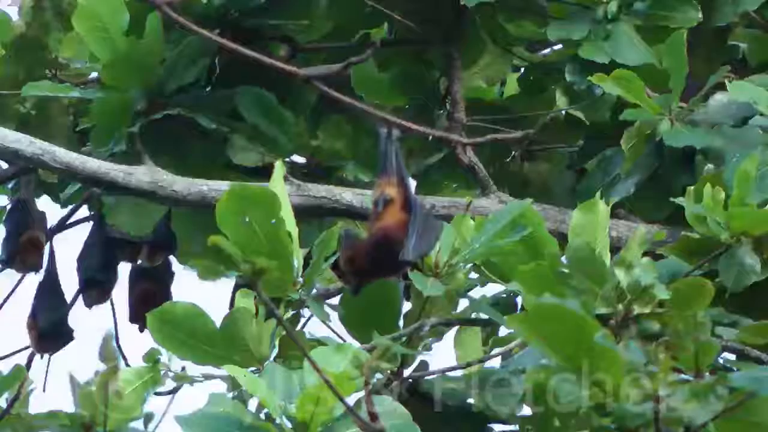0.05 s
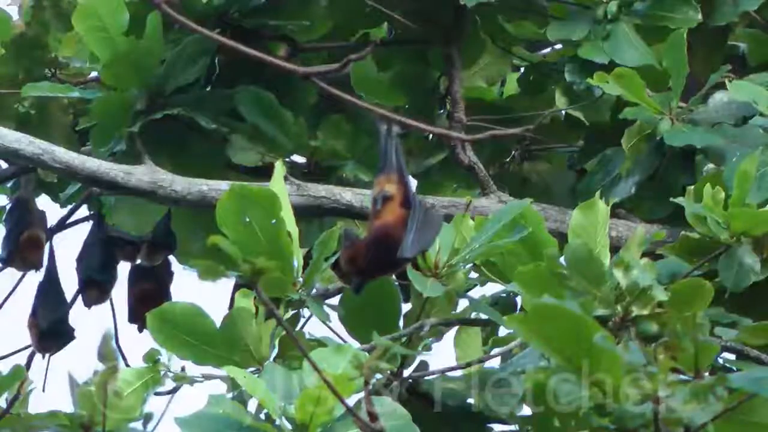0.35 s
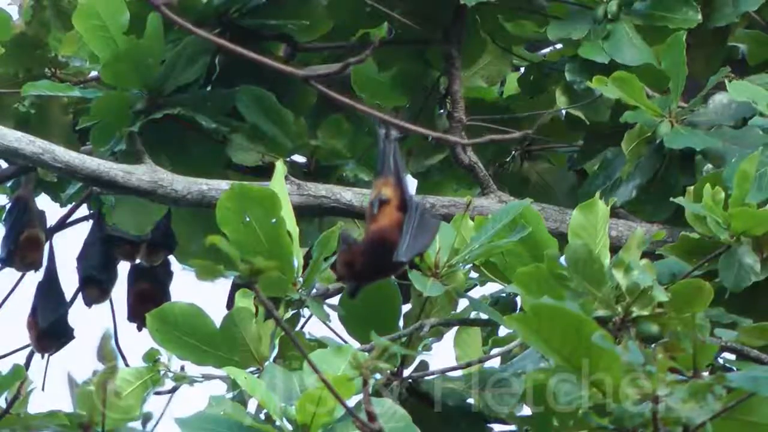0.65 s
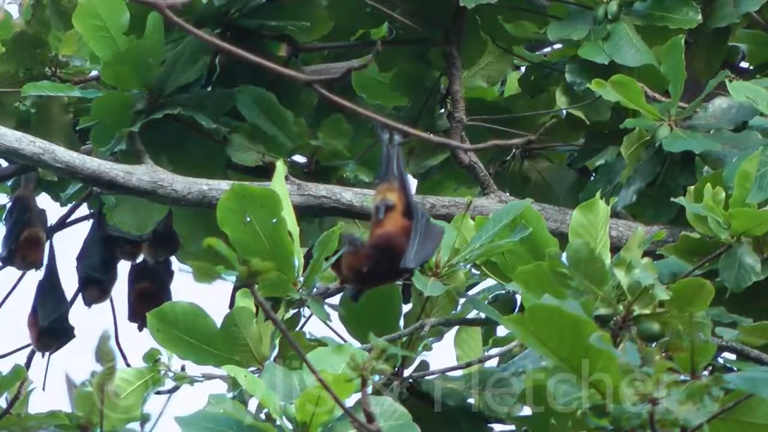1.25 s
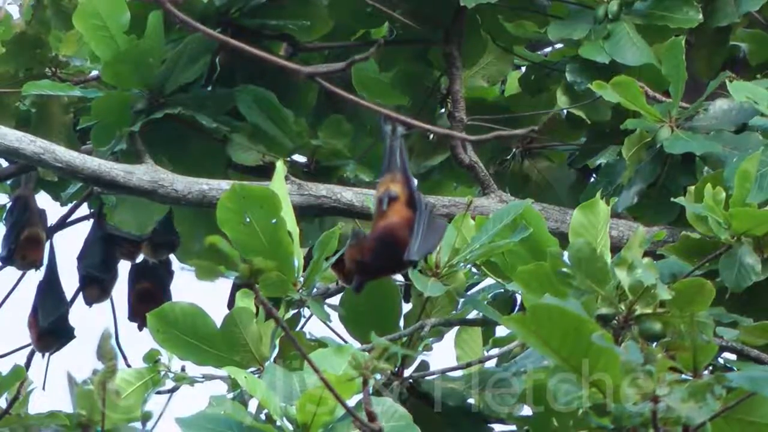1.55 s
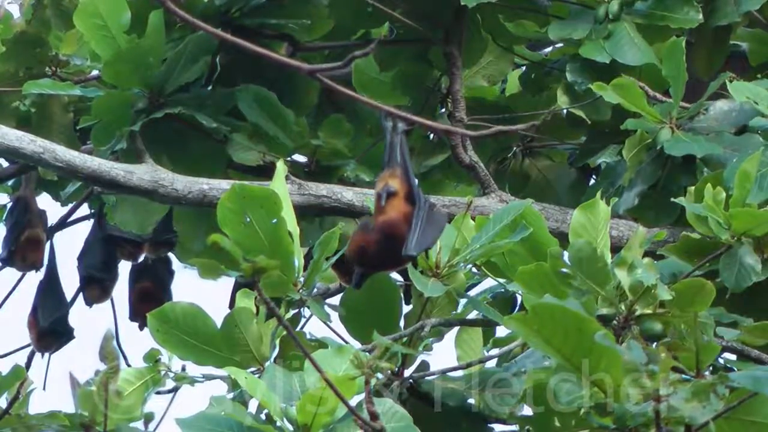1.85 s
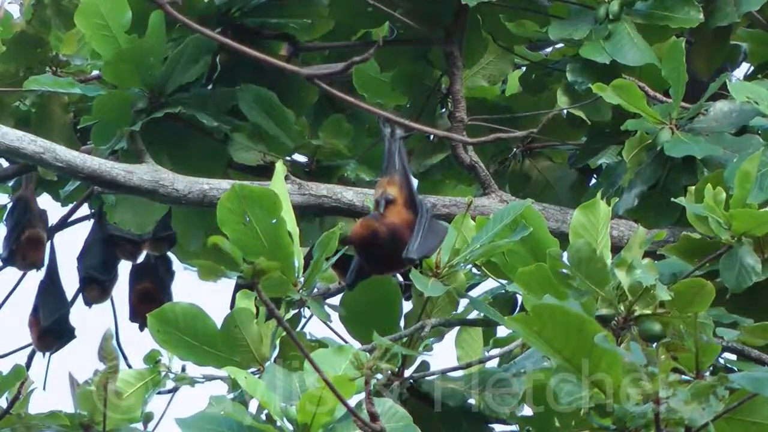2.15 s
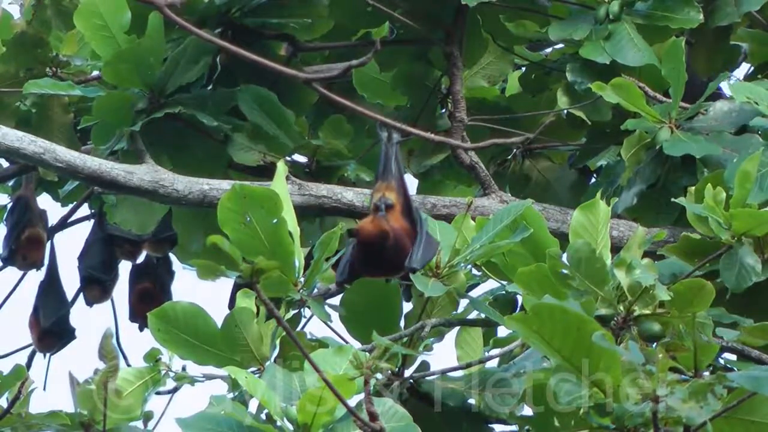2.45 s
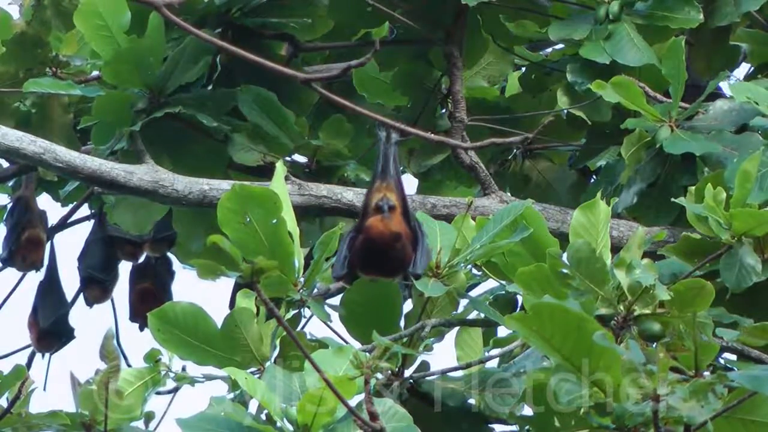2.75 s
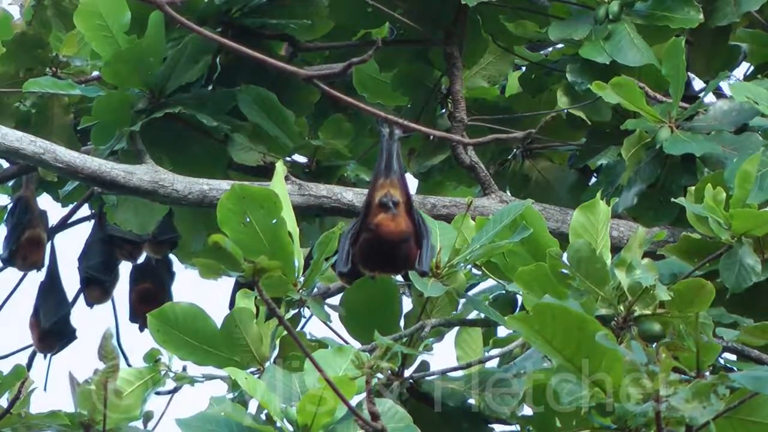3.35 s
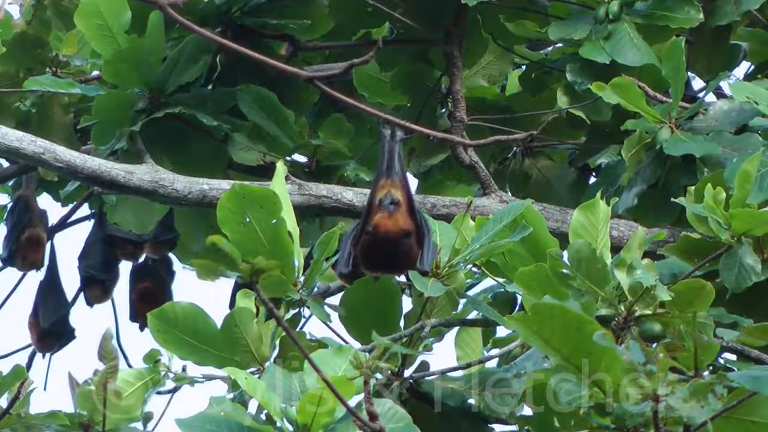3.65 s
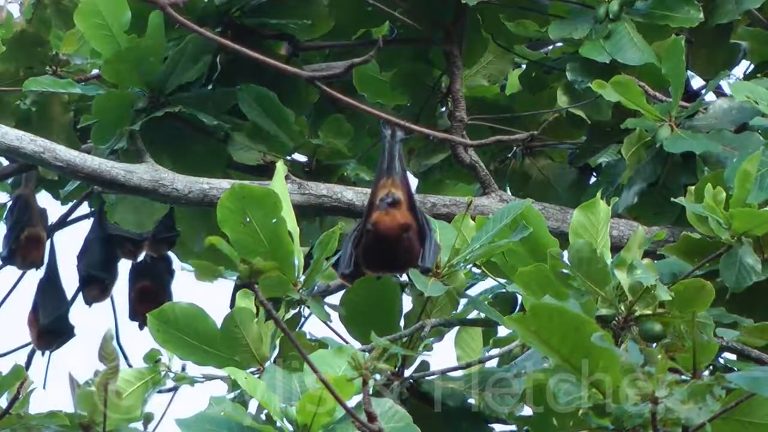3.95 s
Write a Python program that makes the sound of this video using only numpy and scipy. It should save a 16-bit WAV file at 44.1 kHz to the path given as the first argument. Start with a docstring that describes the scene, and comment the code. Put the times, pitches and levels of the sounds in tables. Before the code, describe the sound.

Waves break softly on a shore, with thin bird whistles and chirps in the trees.

```python
"""Surf on a shore, heard from under trees: two waves break with a low roar and a hissing wash of foam,
over a deep rumble and a few soft thumps as the breakers slump. Wind briefly buffets the microphone.
Unseen birds give thin, drawn-out whistles and a few harsh chirps,
which trunks and leaves scatter into echoes."""
import sys
import numpy as np
from scipy import signal
from scipy.fft import rfft, irfft, next_fast_len
from scipy.io import wavfile
from scipy.ndimage import uniform_filter1d, map_coordinates

SR = 44100
rng = np.random.default_rng(int(sys.argv[2]) if len(sys.argv) > 2 else 0)


def bounce(signal):
    """Save signal as a 16-bit WAV file at the path given by the first command-line argument."""
    frames = np.transpose(np.atleast_2d(signal))
    limited = np.clip(frames, -1, 1)
    pcm = np.round(limited * 32767).astype(np.int16)
    wavfile.write(sys.argv[1], SR, pcm)


N = 176400

# Fader rides for the sea's rumble, the breakers' roar, the foam and the wind: t/s, relative level/dB
RUMBLE_RIDE = [(.06, -54), (.5, -53), (.95, -52.5), (1.35, -53.5), (1.7, -58), (2.1, -56), (2.45, -56),
               (2.8, -57), (3.3, -55.5), (3.9, -55.7)]
ROAR_RIDE = [(0.06, -51.5), (0.07, -53), (0.39, -50.5), (0.89, -52), (1.06, -49), (1.12, -52),
             (1.14, -47.5), (1.71, -56.5), (2.1, -51.5), (2.52, -55.5), (3.13, -56), (3.21, -53.5),
             (3.83, -52), (3.97, -53.5)]
FOAM_RIDE = [(0.06, -47.5), (0.35, -47), (0.39, -48.5), (0.73, -49.5), (0.97, -48), (1.14, -50.5),
             (1.16, -49), (1.3, -51.5), (1.56, -51.5), (1.74, -54.5), (2.06, -50.5), (2.71, -55.5),
             (3.49, -47), (3.56, -48), (3.97, -49.5)]
BUFFET_RIDE = [(.04, -49), (.09, -47), (.2, -60), (.4, -54), (.56, -55), (.7, -72), (1.6, -66), (3.4, -66),
               (4, -72)]
# EQ curves for the same four layers and the background hiss: f/Hz, relative level/dB
RUMBLE_EQ = [(20, -26), (40, -10), (65, -1.5), (120, 0.5), (155, -2), (190, 1.5), (240, -4), (330, -15),
             (600, -36)]
ROAR_EQ = [(150, -35), (250, -3), (370, -0.5), (480, -4.5), (545, 0), (635, -3.5), (750, 2), (860, -3),
           (990, -4), (1080, -1), (1150, -5.5), (1225, -1.5), (1310, -6.5), (1420, -.5), (1570, -8),
           (1680, -8.5), (2150, -35), (3600, -100)]
FOAM_EQ = [(900, -20), (1500, -9), (1750, 1), (2100, 0), (2700, -1.5), (4000, -3.5), (5000, -5.5),
           (6300, -9), (8000, -15), (11000, -23.5), (15500, -31.5)]
BUFFET_EQ = [(15, -12), (30, -5), (60, -0.5), (100, -11), (250, -26), (600, -70)]
HISS_EQ = [(1000, -9.5), (3000, -0.5), (6000, 5), (8600, -10), (9800, 3.5), (11000, -8), (15500, -12)]
# Stereo image of sea and hiss: f/Hz, left-right correlation (1 and above is mono)
SHORE_IMAGE = [(30, .1), (60, .3), (125, 0.86), (250, .8), (500, 0.6), (1000, 0.7), (2000, 0.85),
               (4000, .9), (8000, .88), (11000, 1.2)]
# Pan of the sea across the spectrum: f/Hz, left minus right/dB
SEA_PAN = [(60, -2.0), (120, -2.2), (240, -1.0), (480, 0.79), (950, 2.2), (1890, 1.5), (3770, 0.23),
           (7520, 0.11), (15000, 0.0)]
# The first wave breaks a little to the left of the second: t/s, left minus right/dB
SEA_DRIFT = [(0, .1), (1.2, .5), (1.9, -.2), (3.3, -.7)]
# Thumps of slumping breakers: t/s, width/s, level/dB, centre f/Hz
BREAKER_THUMPS = [(.84, .03, -52, 120), (1.02, .04, -48, 280), (2.5, .035, -57, 130)]
# Bird whistles: t/s, length/s, first f/Hz, last f/Hz, level/dB, waver/share of pitch
BIRD_WHISTLES = [(.13, .2, 3740, 3600, -50, .007), (.53, .085, 5000, 4980, -53.5, .007),
                 (.63, .135, 4950, 4710, -48.5, .014), (.76, .225, 4640, 4412, -44, .0012),
                 (1.33, .17, 3280, 3170, -53.5, .005), (1.57, .12, 2880, 2830, -54.5, .004),
                 (1.88, 0.12, 4900, 4650, -56, .018), (2.06, .24, 4370, 4300, -44.8, .0015),
                 (2.92, .075, 4680, 4780, -48, .008), (3.018, .11, 5400, 5500, -54.5, .01),
                 (3.52, .19, 3300, 3425, -49.5, .003), (3.82, .125, 5250, 4930, -50.5, .011),
                 (3.922, .09, 4950, 4700, -47, .009)]
# Slapback of the whistles off the trees: delay/s, level/dB
TREE_ECHOES = [(.085, -13), (.175, -11)]
# Bird chirps: t/s, length/s, first f/Hz, last f/Hz, level/dB, jitter/share of pitch
BIRD_CHIRPS = [(1.422, .045, 4800, 5650, -49.5, .08), (1.616, .03, 4600, 5350, -47.5, .06),
               (1.635, .035, 4356, 4220, -49.5, .02), (1.674, .065, 4650, 4400, -51.5, .04),
               (1.978, .04, 4450, 6100, -42.5, .036), (2.274, .024, 4900, 5900, -44.5, .065)]

FOAM_TRIM_DB, BUFFET_TRIM_DB, HISS_DB = 2.5, -2, -62
WHISTLE_SWELL_POWER, WHISTLE_RELEASE_S, FLUTTER_DB, GLIDE_POWER = .75, .015, 2.8, 2.8
TREES_T60_S, WHISTLE_SEND_DB = .5, -10
RASP_HZ, SPLIT_ABOVE_HZ, SPLIT_OFFSET_HZ, SPLIT_DB = 1300, 5800, 780, -8.5
HIGH_CUT_HZ = 15750


def amp(db):
    """Decibels to gain."""
    return 10 ** (np.asarray(db) / 20)


def along(points, hz):
    """Read (f/Hz, value) points on a log frequency axis."""
    f, v = np.transpose(points)
    return np.interp(np.log(hz + 1), np.log(f + 1), v)


def ride(points):
    """Automation: (t/s, value) points as one value per sample."""
    return np.interp(np.arange(N) / SR, *np.transpose(points))


def wobble(rate_hz, size=N):
    """A smooth random modulator."""
    return map_coordinates(rng.standard_normal(4096), [np.arange(size) * rate_hz / SR], mode="wrap")


def filtered(x, response):
    """Equalise x with a gain that is a function of frequency."""
    m = next_fast_len(N + SR // 4)
    return irfft(rfft(x, m) * response(np.fft.rfftfreq(m, 1 / SR)), m)[..., :N]


def add(track, s, sound):
    """Mix a mono or stereo sound into a stereo track at time s."""
    part = track[:, max(round(s * SR), 0):][:, :sound.shape[-1]]
    part += sound[..., :part.shape[1]]


def noise_bed(eq, image=SHORE_IMAGE, patchy_db=0):
    """Shaped stereo noise, mottled in time and frequency, with its mid channel at rms 1."""
    spectra = signal.stft(rng.standard_normal((2, N)), nperseg=512)[2]
    patches = uniform_filter1d(rng.standard_normal(spectra.shape[1:]), size=5, axis=0)
    patches = uniform_filter1d(patches, size=14, axis=1)
    patches /= np.sqrt(np.mean(patches ** 2))
    pair = signal.istft(spectra * amp(patchy_db * patches), nperseg=512)[1][:, :N]

    def mid_side_gains(hz):
        spread = np.arccos(np.clip(along(image, hz), -1, 1)) / 2
        return amp(along(eq, hz)) * [np.cos(spread), np.sin(spread)]

    mid, side = filtered(pair, mid_side_gains)
    return np.array([mid + side, mid - side]) / mid.std()


def surf():
    """Rumble, roar and foam swell with each wave; breakers slump with soft thumps."""
    rumble = amp(ride(RUMBLE_RIDE)) * noise_bed(RUMBLE_EQ)
    roar = amp(ride(ROAR_RIDE) + .37 * wobble(14)) * noise_bed(ROAR_EQ, patchy_db=.84)
    foam = amp(FOAM_TRIM_DB + ride(FOAM_RIDE) + .24 * wobble(29.98)) * noise_bed(FOAM_EQ, patchy_db=.78)
    sea = rumble + roar + foam
    t = np.arange(N) / SR
    for s, width, db, hz in BREAKER_THUMPS:
        thump_eq = [(hz / 8, -50), (hz / 1.6, 0), (hz * 1.54, 0), (hz * 6, -70)]
        swell = np.exp(-.5 * ((t - s) / width) ** 2)
        sea += amp(db) * swell * noise_bed(thump_eq)
    pan = np.array([[.5], [-.5]])
    sea *= amp(ride(SEA_DRIFT) * pan)
    return filtered(sea, lambda hz: amp(along(SEA_PAN, hz) * pan))


def wind():
    """Wind buffets each microphone port separately, over a faint steady hiss."""
    buffet = noise_bed(BUFFET_EQ, image=[(30, .05)], patchy_db=.5)
    hiss = noise_bed(HISS_EQ, patchy_db=-.5)
    return amp(BUFFET_TRIM_DB + ride(BUFFET_RIDE)) * buffet + amp(HISS_DB) * hiss


def glide(first_hz, last_hz, u):
    """Pitch moves quickly at first and settles as the note (u from 0 to 1) ends."""
    return last_hz + (first_hz - last_hz) * (1 - u) ** GLIDE_POWER


def tone(hz):
    """A sine that follows a pitch curve."""
    return np.sin(2 * np.pi * np.cumsum(hz) / SR)


def whistles():
    """Thin bird notes swell, glide and stop; each path through the leaves flutters in its own way."""
    out = np.zeros((2, N))
    for s, length, first_hz, last_hz, db, waver in BIRD_WHISTLES:
        n = int(length * SR)
        u = np.arange(n) / n
        swell = u ** WHISTLE_SWELL_POWER * np.minimum((1 - u) * length / WHISTLE_RELEASE_S, 1)
        for delay, path_db in [(.00072, 0)] + TREE_ECHOES:  # direct path, then slapback
            hz = glide(first_hz, last_hz, u) * (1 + waver * wobble(218, size=n))
            note = amp(db + path_db + FLUTTER_DB * wobble(58.7, size=n)) * swell * tone(hz)
            add(out, s + delay, note)
            add(out, s + delay, amp(WHISTLE_SEND_DB) * tree_reverb(note))
    return out


def tree_reverb(call):
    """Trunks and leaves scatter a call into a diffuse stereo tail."""
    t = np.arange(SR // 2) / SR
    mid, side = rng.standard_normal((2, len(t))) * amp(-60 * t / TREES_T60_S)
    impulse = np.array([mid + .35 * side, mid - .2 * side]) / np.linalg.norm(mid)
    return signal.fftconvolve(call[None], impulse, axes=1)


def chirp(length, first_hz, last_hz, db, jitter):
    """A fast sweep made harsh by pitch jitter; the highest ones split off a second tone above."""
    n = int(length * SR)
    u = np.arange(n) / n
    hz = glide(first_hz, last_hz, u) * (1 + jitter * wobble(RASP_HZ, size=n))
    split_gain = amp(SPLIT_DB) * (last_hz > SPLIT_ABOVE_HZ) * np.minimum(2 * u, 1)
    upper = tone((last_hz + SPLIT_OFFSET_HZ) * (1 + .025 * wobble(RASP_HZ, size=n)))
    envelope = np.sqrt(2 * np.sin(np.pi * u))
    return amp(db) * envelope * (tone(hz) + split_gain * upper)


def chirps(paths=5):
    """Each chirp arrives directly and along several scattered paths that blur into a noisy tail."""
    out = np.zeros((2, N))
    for s, *shape in BIRD_CHIRPS:
        add(out, s, chirp(*shape))
        for _ in range(paths):
            add(out, s, tree_reverb(chirp(*shape)) / np.sqrt(paths))
    return out


def scene():
    """The mix: a bed of surf and wind, with the birds on top."""
    return surf() + wind() + whistles() + chirps()


def record(dry, silence_s=.037, fade_s=.003):
    """Master: a moment of silence, a snap fade-in and a brick-wall high cut."""
    fade_in = np.clip((np.arange(N) / SR - silence_s) / fade_s, 0, 1)
    return filtered(dry * fade_in, lambda hz: hz < HIGH_CUT_HZ)


dry = scene()
out = record(dry)
bounce(out)
```